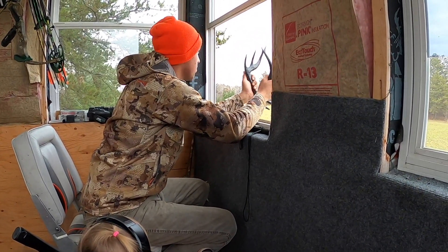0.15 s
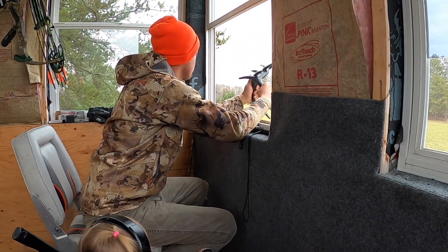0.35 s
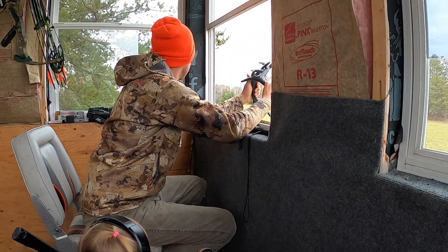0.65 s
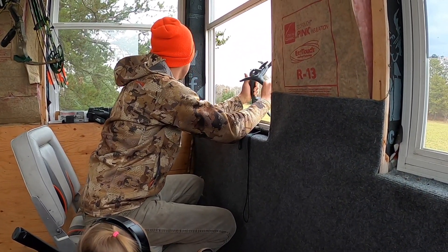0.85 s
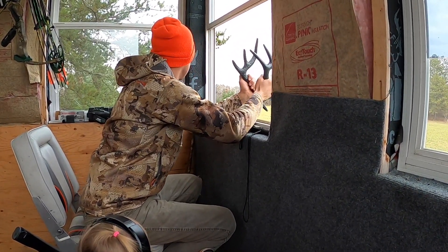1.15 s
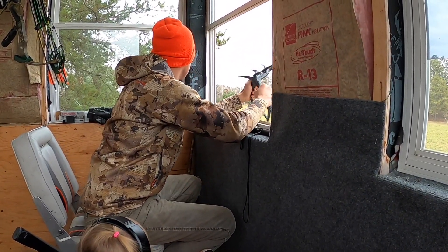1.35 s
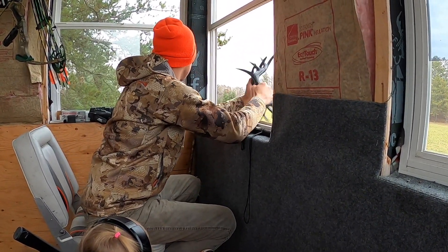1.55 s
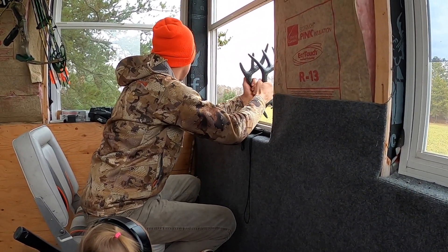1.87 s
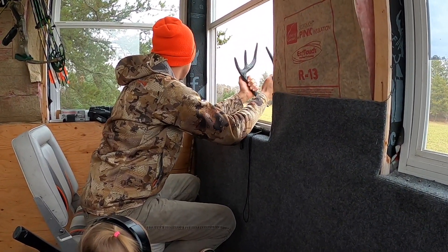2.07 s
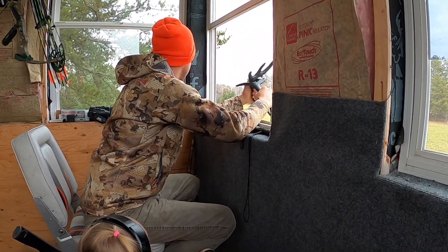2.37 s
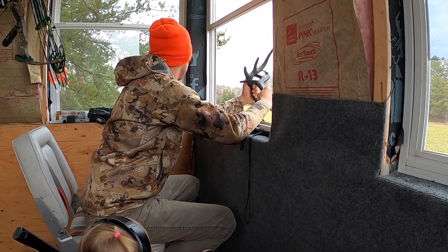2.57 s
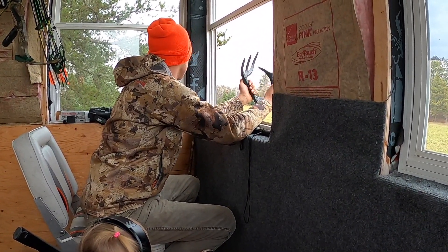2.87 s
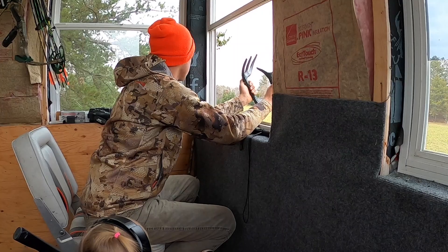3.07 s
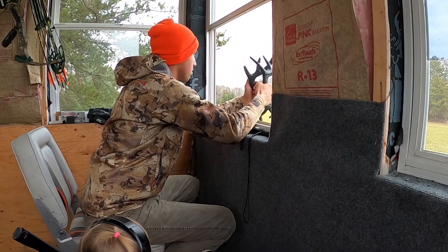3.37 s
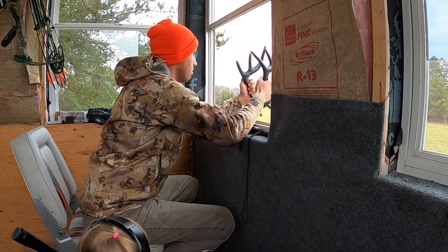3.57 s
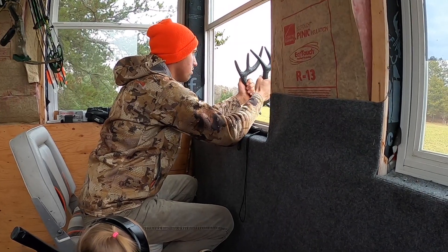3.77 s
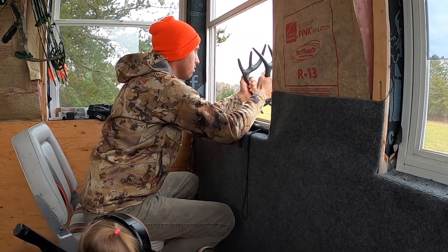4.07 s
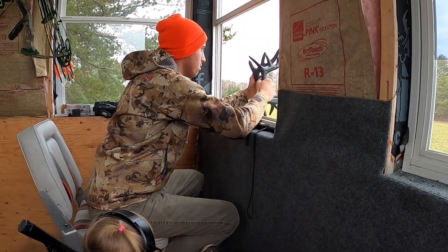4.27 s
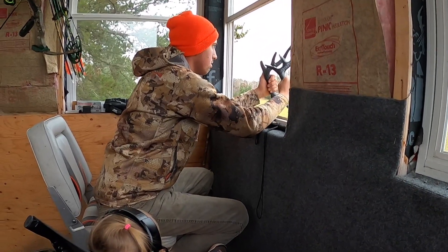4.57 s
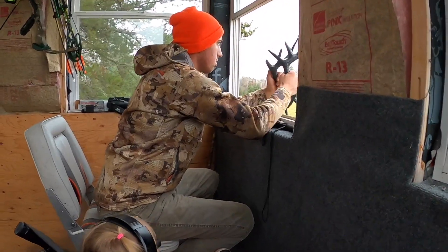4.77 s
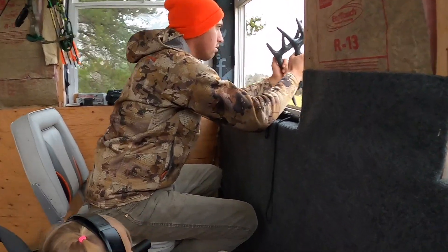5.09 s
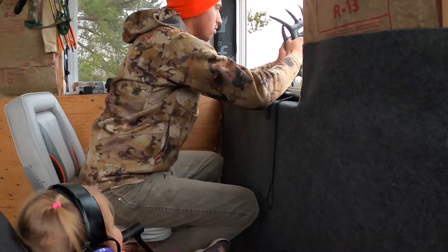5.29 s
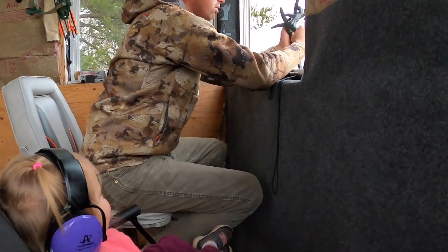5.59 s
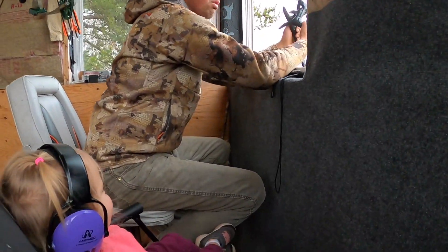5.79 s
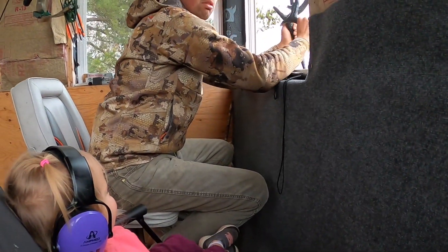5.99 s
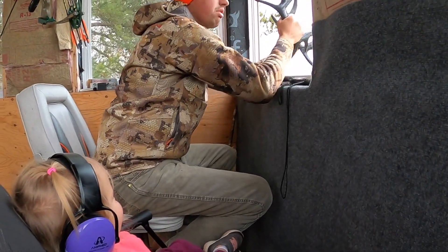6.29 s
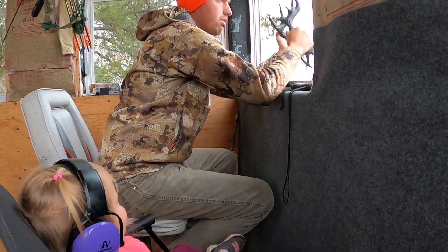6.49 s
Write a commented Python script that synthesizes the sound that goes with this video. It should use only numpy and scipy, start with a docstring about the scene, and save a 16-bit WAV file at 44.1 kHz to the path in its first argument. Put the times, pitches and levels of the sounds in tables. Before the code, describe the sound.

A quiet small wooden hut with very faint air and a distant soft hum, heard in stereo from a few metres away. At 0.2 s antlers graze and crack together in a tight cluster, with a low wall boom and short dense echo. Sleeves rustle faintly. Sharp clashes follow at 1.1, 1.35 and 1.65 s, a tine rings lightly at 1.8, and faint low tones start gliding upwards. After a scrape at 2.1, a hard clack lands at 2.3, then soft beam bumps and a finer scrape near 2.7. After a pause comes a skidding clash at 3.3, another pause, then a heavy, thumping hit at 4.33 and a small ring at 4.5. Rapid clacks come at 4.85. From 5.0 to 5.5 dull close knocks, ticks and cloth rustle surround a clash at 5.3. Bright cracks return at 6.2 and 6.6, ending abruptly.

```python
"""Faint air and a far-off hum (filtered noise) lie under a pair of antlers clashed at a plywood hunting blind.
From 0.2 s to 6.6 s uneven clashes (noise bursts, modes) touch, strike and skid, with a short dense echo and low boom.
From 0.5 s the main beam hums softly and sleeves rustle; at 1.8 s and 4.5 s a tine rings, a decaying mode set.
From 1.9 s faint tones glide upwards, and from 2.1 s tines scrape, in trains of tiny slips.
From 5.0 s to 5.5 s small, nearly dry knocks and ticks (coloured noise) sound close by."""
import sys
import numpy as np
from scipy import signal
from scipy.fft import rfft, irfft, next_fast_len
from scipy.io import wavfile
from scipy.ndimage import uniform_filter1d, minimum_filter1d

SR = 44100
rng = np.random.default_rng(int(sys.argv[2]) if len(sys.argv) > 2 else 0)


def int16_out(signal):
    """Quantize to a 16-bit WAV file."""
    q = np.round(np.clip(np.atleast_2d(signal).T, -1, 1) * 32767)
    wavfile.write(sys.argv[1], SR, q.astype(np.int16))


N = 292824
TIME = np.arange(N) / SR


def undb(db):
    """Decibels to gain."""
    return 10 ** (np.asarray(db) / 20)


def unit(x):
    """Scale to rms 1."""
    return x / np.sqrt(np.mean(x ** 2))


def at_hz(points, hz):
    """Read (Hz, value) points on a log-frequency axis."""
    f, value = np.transpose(points)
    return np.interp(np.log(np.maximum(hz, 1)), np.log(f), value)


def colour(x, points):
    """Minimum-phase filter, built by cepstrum, whose gain follows (Hz, dB) points."""
    size = 2 * next_fast_len(x.shape[-1])
    log_gain = np.log(undb(at_hz(points, np.fft.rfftfreq(size, 1 / SR))))
    cepstrum = irfft(log_gain)
    # fold to positive time: causal
    cepstrum[1:size // 2] *= 2
    cepstrum[size // 2 + 1:] = 0
    response = np.exp(rfft(cepstrum))
    return irfft(rfft(x, size) * response)[..., :x.shape[-1]]


def band(x, hz, width_hz):
    """A resonance with steep skirts: two peak filters in series."""
    b, a = signal.iirpeak(hz, hz / width_hz, fs=SR)
    return signal.lfilter(b, a, signal.lfilter(b, a, x))


def fade(t, t60_s):
    """Free exponential decay, -60 dB at t60_s."""
    return np.exp(-np.log(1000) * t / t60_s)


def add(out, s, x):
    """Mix x into out from time s."""
    i = max(int(s * SR), 0)
    out[..., i:i + x.shape[-1]] += x[..., :max(N - i, 0)]


def walk(rate_hz):
    """Random values joined by straight lines, spread near 1."""
    return np.interp(TIME * rate_hz, np.arange(N // 100), rng.standard_normal(N // 100))


# two microphone ports: (frequency [Hz], side minus mid [dB])
PORT_WIDTH = [(60, -3.5), (500, -9), (1000, -7.5), (2000, -2.5), (4000, -3), (8000, 3)]


def diffuse(size):
    """Noise from all sides at the two ports: alike in the bass, unlike in the treble."""
    mid, side = rng.standard_normal((2, size))
    share = undb(at_hz(PORT_WIDTH, np.fft.rfftfreq(size, 1 / SR)))
    spectrum = rfft(mid) + share * rfft(side) * np.array([[1], [-1]])
    return irfft(spectrum / np.hypot(1, share), size)


def drone(hz, half_width_hz):
    """A blurred tone: a carrier on the pitch track hz times slow complex noise."""
    lowpass = signal.butter(2, half_width_hz, fs=SR, output="sos")
    waver = signal.sosfilt(lowpass, diffuse(len(hz)) + 1j * diffuse(len(hz)))
    carrier = np.exp(2j * np.pi * np.cumsum(hz) / SR)
    return unit((waver * carrier).real)


# still air outside: (frequency [Hz], gain [dB])
AIR_COLOUR = [(20, -9), (39, -13.5), (71, -31), (200, -25.5), (300, -33), (536, -37.5), (1000, -37.5),
              (1600, -38), (3000, -45), (7000, -47.5), (10000, -66), (14000, -78)]
AIR_DB = -65.5
# far-off hum: (time [s], level [dB])
HUM_LEVELS = [(0, -65), (.3, -74), (.75, -59), (1.2, -68.5), (2.5, -71.5), (3, -86), (4.8, -75.5),
              (5.25, -57), (5.8, -73.5), (6.64, -61)]
HUM_HZ, HUM_HALF_WIDTH_HZ = 288, 82
# rising low tones: (time [s], level before the swell [dB])
GLIDE_STARTS = [(1.85, -71.5), (2.649, -72), (3.549, -71.5), (4.449, -72)]
GLIDE_START_HZ, GLIDE_HZ_PER_S, GLIDE_S, GLIDE_HALF_WIDTH_HZ = 150, 260, .85, 20


def background():
    """Faint air, a hum that swells, and low tones that fade in, rise steadily and fade out."""
    out = unit(colour(diffuse(N), AIR_COLOUR)) * undb(AIR_DB + 1.5 * walk(1.4))
    hum_db = np.interp(TIME, *np.transpose(HUM_LEVELS))
    out += drone(np.full(N, HUM_HZ), HUM_HALF_WIDTH_HZ) * undb(hum_db)
    t = np.arange(SR) / SR
    swell = np.sqrt(np.abs(np.sin(np.pi * np.minimum(t / GLIDE_S, 1))))
    for s, db in GLIDE_STARTS:
        glide = drone(GLIDE_START_HZ + GLIDE_HZ_PER_S * t, GLIDE_HALF_WIDTH_HZ)
        add(out, s, undb(db) * swell * glide)
    return out


# echo decay: (band centre [Hz], t60 [s])
HUT_DECAY = [(200, .33), (530, 0.22), (1390, 0.14), (3680, 0.2), (6000, 0.24), (10000, 0.17)]


def hut_echo(t, build_s):
    """Reflections thicken over the first milliseconds, then each band dies at its own rate; unit energy."""
    hz = np.fft.rfftfreq(len(t), 1 / SR)
    noise = rfft(diffuse(len(t)))
    centres_hz = np.array(HUT_DECAY)[:, 0]
    x = 0
    for share, (_, t60_s) in zip(np.eye(len(centres_hz)), HUT_DECAY):
        weight = at_hz(np.c_[centres_hz, share], hz)
        x = x + irfft(noise * weight, len(t)) * fade(t, t60_s)
    x = x * (1 - np.exp(-t / build_s))
    return x / np.sqrt(np.sum(x ** 2) / 2)


# echo colour: (frequency [Hz], gain [dB])
ECHO_COLOUR = [(300, 2), (1500, -1), (4000, 0.5), (8000, -4.5), (13000, -7.5)]


def in_hut(x, t, echo_db):
    """Direct sound plus a freshly drawn echo, which changes as the antlers move."""
    echo = signal.fftconvolve(colour(x, ECHO_COLOUR)[None], hut_echo(t, build_s=0.0057), axes=1)
    return x + undb(echo_db) * echo[:, :len(t)]


def gesture(moves, attack_s=.055, release_t60_s=0.038):
    """Rubbing gathers speed on a linear ramp, holds if long enough, and dies away after its length."""
    gain = 0
    for s, length_s, db in moves:
        attack = np.clip((TIME - s) / attack_s, 0, 1)
        release = fade(np.maximum(TIME - s - length_s, 0), release_t60_s)
        gain = gain + undb(db) * attack * release
    return gain


def rubbing(moves, points, grains_per_s, grain_db, gain_db, pressure_db=3.0):
    """Countless tiny slips of unequal size under a wavering pressure, smeared by the hut."""
    slips = (rng.random(N) < grains_per_s / SR) * rng.standard_normal(N)
    slips = slips * undb(grain_db * walk(120) + pressure_db * walk(25))
    x = unit(colour(slips, points)) * gesture(moves) * undb(gain_db)
    echo = hut_echo(np.arange(2 ** 14) / SR, build_s=0.007)
    return x + signal.fftconvolve(x[None], echo, axes=1)[:, :N]


# jacket sleeves: (time [s], length [s], level before gain_db [dB])
SLEEVE_MOVES = [(.6, 0.38, -71.5), (1.2, 0.13, -65.5), (1.83, .11, -86.5), (3.92, 0.14, -78),
                (5.08, 0.19, -54.5), (5.45, 0.083, -49.5)]
# cloth: (frequency [Hz], gain [dB])
CLOTH_COLOUR = [(180, -24.5), (300, -13.5), (384, -10.5), (583, -24.5), (734, -8), (2100, -8), (2730, -16),
                (6280, -21), (12000, -66), (15600, -94.5), (22000, -120)]


def sleeves():
    """Cloth rubs on cloth in tiny irregular slips."""
    return rubbing(SLEEVE_MOVES, CLOTH_COLOUR, grains_per_s=1200, grain_db=6.5, gain_db=-4.0)


# things shifting near the microphone: (time [s], thud level [dB], tick level [dB])
KNOCK_EVENTS = [(5.001, -43.5, -49), (5.062, -46.5, -51), (5.105, -32, -39), (5.113, -36.5, -65),
                (5.137, -41.5, -42), (5.195, -43.5, -57), (5.23, -44, -51.5), (5.275, -45, -48.5),
                (5.504, -41, -57)]
# thud: (frequency [Hz], gain [dB])
THUD_COLOUR = [(50, 4), (120, 2.5), (260, -2), (500, -19), (1000, -24.5), (3000, -59.5)]
# tick: (frequency [Hz], gain [dB])
TICK_TONE = [(400, -4.5), (1000, -7.5), (1550, 4.5), (2100, -4), (4000, -7), (7000, -5), (11000, -33.5),
             (16000, -42.5)]


def knocks(thud_t60_s=.045, tick_t60_s=0.017, echo_db=-8):
    """Close by, so they are short and almost dry: a tick on top of a dull thud."""
    out, t = np.zeros((2, N)), np.arange(2 ** 13) / SR
    for s, thud_db, tick_db in KNOCK_EVENTS:
        thud = colour(rng.standard_normal(len(t)) * fade(t, thud_t60_s), THUD_COLOUR)
        tick = colour(rng.standard_normal(len(t)) * fade(t, tick_t60_s), TICK_TONE)
        x = undb(thud_db) * thud / thud[:440].std() + undb(tick_db) * tick / tick[:130].std()
        add(out, s, in_hut(x, t, echo_db))
    return out


# blows reaching the hut through arms and sill: (time [s], boom level [dB], wall level before shares [dB])
HUT_BLOWS = [(0.282, -39.5, -55.5), (1.11, -46.5, -48), (1.347, -44.5, -58.5), (1.676, -44.5, -50.5),
             (2.31, -37, -49.5), (2.435, -41.5, -60), (3.337, -37, -50.5), (4.333, -33, -27.5),
             (4.862, -43.5, -59.5), (5.352, -50.5, -55.5), (5.501, -47.5, -64.5), (6.198, -44, -49),
             (6.291, -39, -58), (6.585, -38.5, -40.5)]
# boom, panel, knock, rap: (frequency [Hz], width [Hz], t60 [s])
HUT_RESONANCES = [(26.6, 8.8, 1), (72, 35, 0.66), (155.4, 43, 0.14), (330, 4100, 0.04)]
# panel, knock, rap: (share of the wall level [dB])
WALL_SHARES = [0.5, -1.5, -12.5]


def thumps(rise_s=0.0047, side_db=-13):
    """The light hut booms, its wall panels shudder and the sill knocks: decaying bands of noise."""
    out, t = np.zeros((2, N)), np.arange(SR) / SR
    for s, boom_db, wall_db in HUT_BLOWS:
        levels_db = [boom_db] + [wall_db + share_db for share_db in WALL_SHARES]
        for db, (hz, width_hz, t60_s) in zip(levels_db, HUT_RESONANCES):
            # the first second lets the filter settle
            noise = band(rng.standard_normal((2, 2 * SR)), hz, width_hz)[:, SR:]
            mid, side = noise * fade(t, t60_s) * (1 - np.exp(-t / rise_s))
            x = unit(mid) + undb(side_db) * unit(side) * np.array([[1], [-1]])
            add(out, s, undb(db) * x / x[:, :SR // 10].std())
    return out


# soft bumps on the main beam: (time [s], level before doubling [dB])
BEAM_BUMPS = [(0.5, -48), (0.619, -43.5), (1.433, -35), (1.464, -37.5), (2.469, -35.5), (2.631, -38.5),
              (2.66, -37.5), (2.741, -38.5), (4.345, -25.5)]


def bumps(t60_s=0.074, rise_s=0.0088):
    """A soft contact wakes only the lowest bending mode of the beam."""
    out, t = np.zeros(N), np.arange(SR // 2) / SR
    for s, db in BEAM_BUMPS:
        hz = 315 * (1 + 0.02 * rng.standard_normal())
        envelope = fade(t, t60_s) * (1 - np.exp(-t / rise_s))
        add(out, s, 2 * undb(db) * np.sin(2 * np.pi * hz * t) * envelope)
    return out


def ring(t, modes, scatter_db):
    """Modes struck at a random spot, so each gets its own share and sign; unit energy."""
    hz, db, t60_s = np.transpose(modes)
    level_chance, sign_chance, pitch_chance = rng.standard_normal((3, len(hz)))
    gain = undb(db + scatter_db * level_chance) * np.sign(sign_chance)
    hz = hz * (1 + 0.009 * pitch_chance)  # the grip shifts the pitch a little
    x = sum(g * np.sin(2 * np.pi * f * t) * fade(t, d) for f, g, d in zip(hz, gain, t60_s))
    return x / np.linalg.norm(x)


# tines sliding: (time [s], length [s], level before gain_db [dB])
SCRAPE_MOVES = [(2.075, 0.11, -50), (2.685, 0.068, -44.5), (3.26, 0.047, -53), (4.255, 0.1, -49),
                (4.68, 0.19, -64.5), (6.06, 0.099, -58.5), (6.5, .07, -67)]
# sliding bone: (frequency [Hz], gain [dB])
BONE_COLOUR = [(240, -43), (400, -14.5), (547, -35), (759, -19), (1460, -0.5), (1760, -10.5), (2000, -9),
               (4370, -13), (12000, -46), (15600, -81.5), (22000, -120)]
# antler modes before scatter: (frequency [Hz], level [dB], t60 [s])
ANTLER_MODES = [(282, 8, 0.051), (873, -5, .09), (1120, 2.5, 0.062), (1186, -2.5, 0.081), (1339, 1, 0.11),
                (1443, 1.5, 0.11), (1692, -3.5, 0.089), (1922, 0, 0.11), (2036.5, 4, 0.1),
                (2243, 7.5, 0.044), (2577, -1, 0.11), (2960, 5, 0.054), (3078, 0.5, 0.028),
                (3500, -6.5, 0.017), (3850, 1, .04), (4240, 1.5, 0.055), (4595, 9, 0.034),
                (4850, 0.5, 0.049), (5132, -2, .035), (7440, -2, .03)]


def scrapes(ring_db=-15):
    """Ridged tines slide over each other and keep the beams ringing faintly."""
    slips = rubbing(SCRAPE_MOVES, BONE_COLOUR, grains_per_s=1300, grain_db=4, gain_db=-4.5)
    body = ring(np.arange(2 ** 13) / SR, ANTLER_MODES, scatter_db=4)
    return slips + undb(ring_db) * signal.fftconvolve(slips, body[None], axes=1)[:, :N]


# light taps: (time [s], level before gain_db [dB], pitch of the strongest mode before scatter [Hz])
TINE_TAPS = [(1.783, -27, 1970), (4.506, -33, 1976)]
# free tine before transposing and scatter: (frequency [Hz], level [dB], t60 [s])
TINE_MODES = [(1200, -2, 0.05), (1466, 6, 0.052), (1730, -15, 0.046), (1908, 10.5, 0.026), (2970, -4, .08),
              (3550, -26, 0.074)]


def taps(gain_db=-6, ring_db=-9, echo_db=-3):
    """A tine that springs free buzzes briefly and rings on its few modes."""
    out, t = np.zeros((2, N)), np.arange(2 ** 14) / SR
    main_hz = max(TINE_MODES, key=lambda mode: mode[1])[0]
    for s, db, hz in TINE_TAPS:
        modes = [(f * hz / main_hz, d, t60_s) for f, d, t60_s in TINE_MODES]
        tick = rng.standard_normal(len(t)) * fade(t, .045)
        buzz = sum(undb(d / 2) * band(tick, f, f / 5) for f, d, _ in modes)
        x = undb(ring_db) * unit(ring(t, modes, scatter_db=2)) + unit(buzz)
        add(out, s, undb(db + gain_db) * in_hut(x / x[:300].std(), t, echo_db))
    return out


# bone contact: (frequency [Hz], gain [dB])
CRACK_COLOUR = [(88, -40), (150, -21), (280, -17.5), (545, -22.5), (871, -4), (960, -8), (1100, -1.5),
                (1210, -6), (1390, 1), (1760, -2.5), (1940, -2), (4580, -1), (7180, -8), (12400, -42),
                (16000, -61)]


def contact(t, low_db, high_db, crack_db=-4.0, chatter_db=-8, ring_db=-9.0, ripple_db=4.0):
    """Bone on bone: a crack, a snap of a few milliseconds, a chatter over the ridges, then the beams ring."""
    crack = signal.unit_impulse(len(t))
    snap = rng.standard_normal(len(t)) ** 3 * fade(t, .013)
    chatter = rng.standard_normal(len(t)) ** 5 * fade(t, .09)
    body = ring(t, ANTLER_MODES, scatter_db=3.5)
    x = unit(snap) + undb(crack_db) * unit(crack)
    x = x + undb(chatter_db) * unit(chatter) + undb(ring_db) * unit(body)
    # thick beams sound low, thin tips bright
    spot = [(1200, low_db), (3000, 0.0021), (6500, high_db), (12000, high_db + 8)]
    # every pair of tines has its own broad, heavily damped resonances
    tine_hz = np.geomspace(700, 9000, 24)
    ripple = np.c_[tine_hz, ripple_db * rng.standard_normal(len(tine_hz))]
    x = colour(colour(colour(x, CRACK_COLOUR), spot), ripple)
    return x / np.sqrt(uniform_filter1d(x ** 2, size=88).max())  # loudest 2 ms at rms 1


# grazes before a blow, skids pressed on after it: (time [s], length [s], level before contact scatter [dB])
SKID_EVENTS = [(0.219, 0.012, -56.5), (0.232, 0.038, -35.5), (0.288, 0.016, -22), (1.055, .011, -47),
               (1.069, .015, -30.5), (1.117, 0.021, -27.5), (1.324, 0.008, -51.5), (1.35, 0.014, -29.5),
               (1.656, 0.035, -22.5), (2.253, 0.055, -39), (3.293, 0.019, -41.5), (3.324, 0.05, -21.5),
               (4.311, .013, -39.5), (4.334, 0.024, -26.5), (4.85, 0.0091, -38), (5.34, 0.029, -21.5),
               (6.149, 0.036, -38.5), (6.212, .05, -22.5), (6.562, 0.016, -48.5), (6.586, 0.031, -32.5)]


def skids(count=5, scatter_db=3.0, low_db=1, high_db=-2, echo_db=2):
    """A skid over the ridges is a handful of small contacts, unevenly spaced and of unequal strength."""
    out, t = np.zeros((2, N)), np.arange(2 ** 14) / SR
    for s, length_s, db in SKID_EVENTS:
        delays_s = length_s * (np.arange(count) + rng.random(count)) / count
        sizes = undb(scatter_db * rng.standard_normal(count))
        run = np.zeros(len(t))
        for delay_s, size in zip(delays_s, sizes):
            add(run, delay_s, size * contact(t[:2 ** 12], low_db, high_db))
        add(out, s, undb(db) * in_hut(run, t, echo_db))
    return out


# tine on tine: (time [s], direct peak level [dB], low colour before offset [dB], high colour before offset [dB])
CLACK_EVENTS = [(0.2316, -24, -3, 0.5), (0.248, -20.5, -14.5, -5.5), (0.282, -11, -5, -3),
                (0.297, -14.5, 6.5, -9.5), (0.418, -45, 21, -37), (1.0679, -19.5, 2, -5.5),
                (1.107, -8.5, -4, 2), (1.11, -15, -1.5, -2.5), (1.3316, -10.5, -10.5, 4),
                (1.3451, -8.5, -8.5, -9.5), (1.6229, -30.5, 17, 6), (1.6402, -19.5, -2, 3),
                (1.6463, -12, -8, 12), (1.68, -15.5, -2, -5), (1.724, -29.5, -8, -23), (2.008, -56.5, 1, 6),
                (2.25, -26.5, -2.5, -16), (2.3085, -8.5, -6, 4.5), (2.314, -14, 10.5, 4.5),
                (2.42, -24, 12, 7), (2.434, -29.5, 17.5, -0.5), (2.625, -37, 7, -6), (3.314, -10, -5.5, 2),
                (3.321, -12.5, 2, 3.5), (3.353, -12.5, -5, -4), (3.369, -29.5, 7.5, 5),
                (4.3265, -9.5, -13, 2), (4.3447, -13, 5.5, 0.5), (4.434, -30.5, -5, -0.5),
                (4.8449, -33.5, 5, -8.5), (4.8571, -12.5, -6, 0.5), (4.8726, -12, -15, -0.5),
                (4.8906, -16, -1, -8), (5.2951, -20, 10, -4), (5.3231, -14, 5, 1),
                (5.3501, -10.5, -6.5, 7.5), (5.427, -29.5, 18, 7), (5.637, -33.5, 11, -8.5),
                (5.725, -51, 20.5, -9.5), (6.1519, -27, 7, -9), (6.192, -14.5, 4, 3.5),
                (6.201, -7.5, -8, 9), (6.2912, -18, 1, 0.5), (6.5804, -12.5, -0.5, 6),
                (6.586, -9.5, 0.5, 13.5), (6.608, -12, -5, -7)]


def clacks(low_offset_db=-1, high_offset_db=-1, echo_db=-2):
    """Each blow is one contact, heard in the hut."""
    out, t = np.zeros((2, N)), np.arange(2 ** 14) / SR
    for s, db, low_db, high_db in CLACK_EVENTS:
        blow = contact(t, low_db + low_offset_db, high_db + high_offset_db)
        add(out, s, undb(db) * in_hut(blow, t, echo_db))
    return out


def scene():
    """Air, sleeves, hut and antlers."""
    surroundings = background() + sleeves() + knocks() + thumps()
    return surroundings + bumps() + scrapes() + taps() + skids() + clacks()


def limiter(x, ceiling=.95):
    """The gain dips smoothly for a moment around any peak that passes the ceiling."""
    gain = np.minimum(1, ceiling / (np.abs(x).max(axis=0) + 1e-9))
    held = minimum_filter1d(gain, size=61)
    return x * uniform_filter1d(uniform_filter1d(held, size=31), size=31)


# two microphone ports: (frequency [Hz], left minus right [dB])
PORT_TILT = [(60, -0.5), (250, -1.5), (1000, -0.5), (2300, 1.5), (4400, 2), (6000, 1.5), (8000, -4.5),
             (14000, 0)]


def record(dry, top_hz=15800):
    """The left port hears all two samples late; the ports differ in colour, peaks are limited, the top is cut."""
    left = colour(np.r_[0, 0, dry[0, :-2]], [(hz, db / 2) for hz, db in PORT_TILT])
    right = colour(dry[1], [(hz, -db / 2) for hz, db in PORT_TILT])
    lowpass = signal.ellip(8, .2, 70, top_hz, fs=SR, output="sos")
    return signal.sosfilt(lowpass, limiter(np.array([left, right])))


dry = scene()
out = record(dry)
int16_out(out)
```